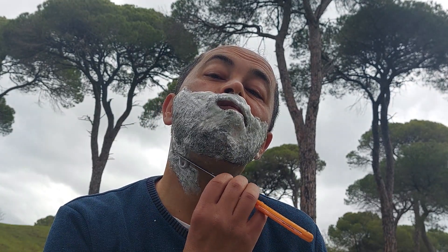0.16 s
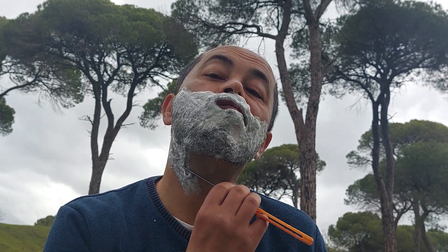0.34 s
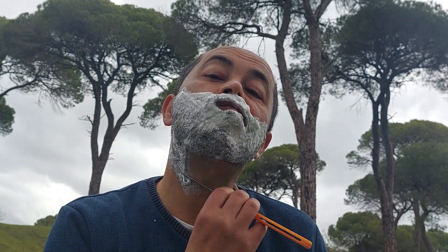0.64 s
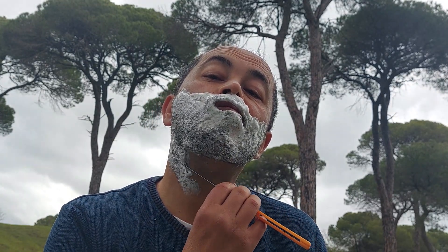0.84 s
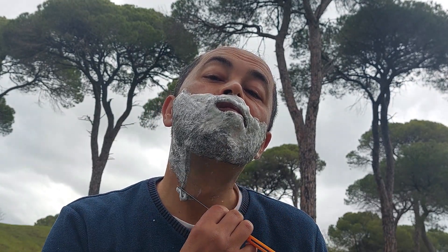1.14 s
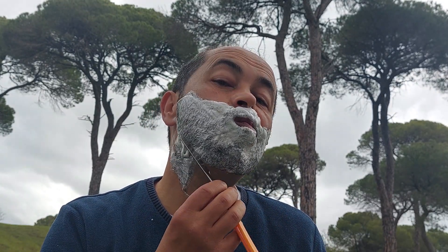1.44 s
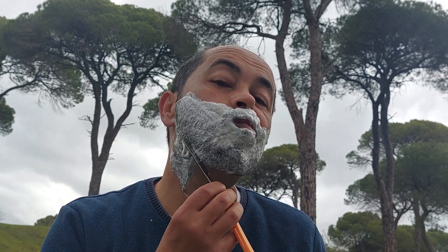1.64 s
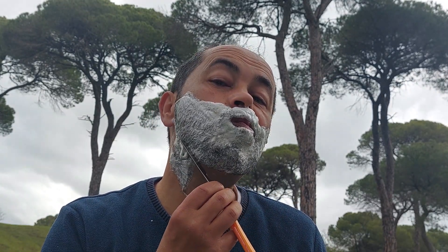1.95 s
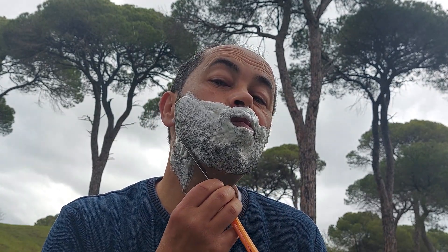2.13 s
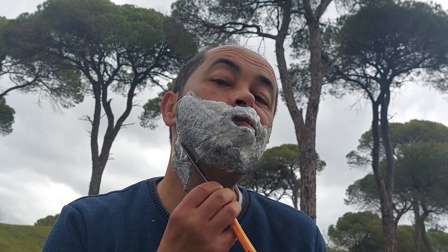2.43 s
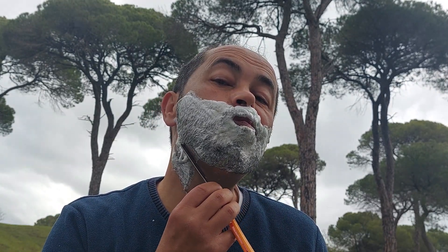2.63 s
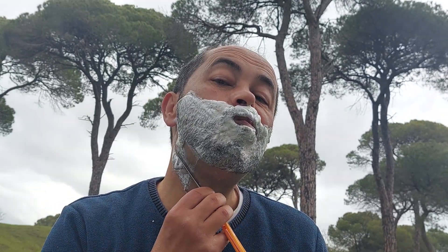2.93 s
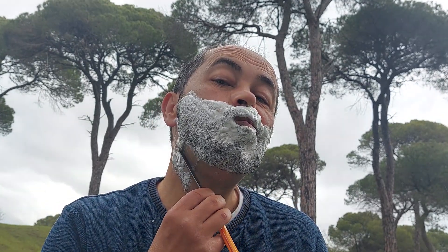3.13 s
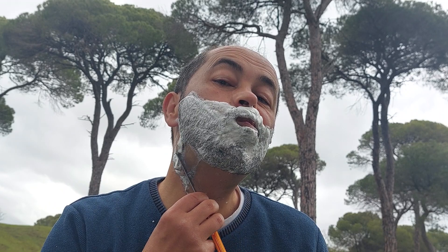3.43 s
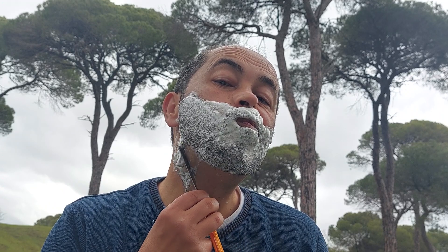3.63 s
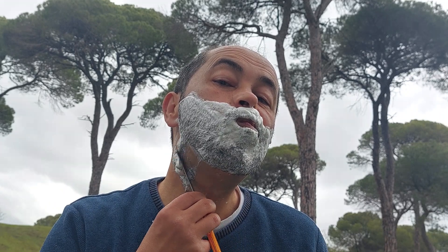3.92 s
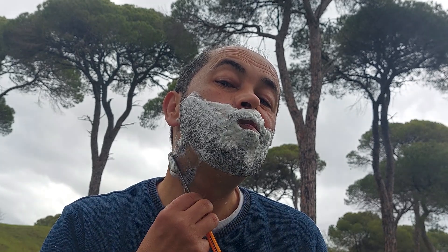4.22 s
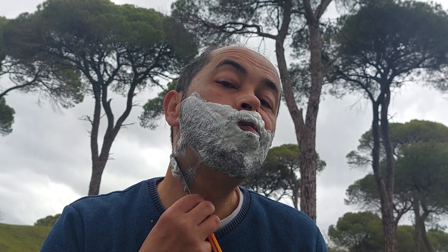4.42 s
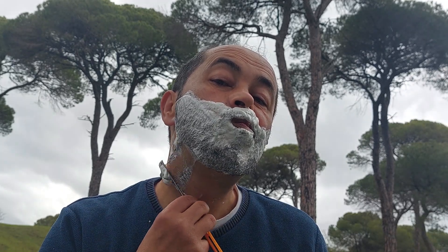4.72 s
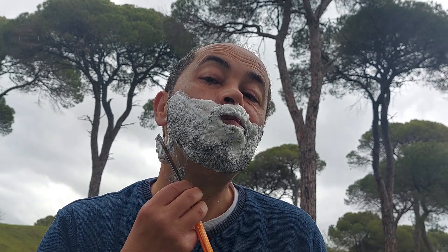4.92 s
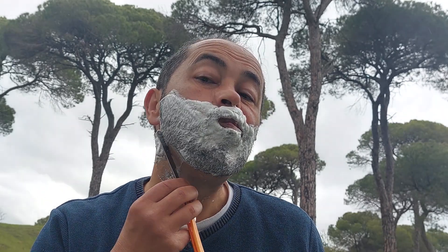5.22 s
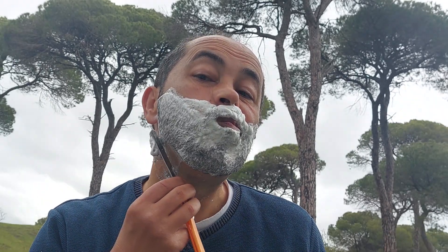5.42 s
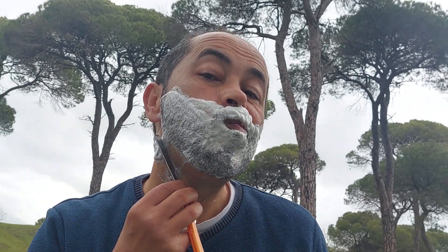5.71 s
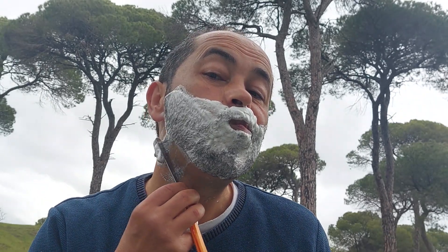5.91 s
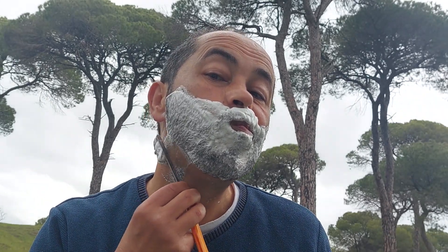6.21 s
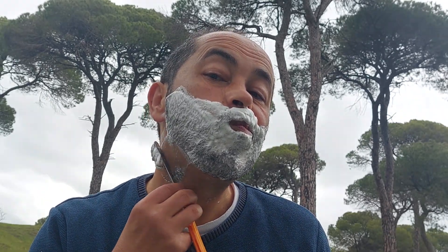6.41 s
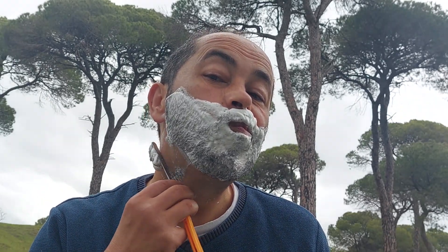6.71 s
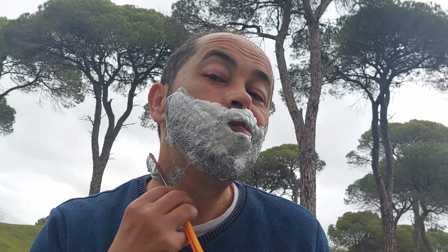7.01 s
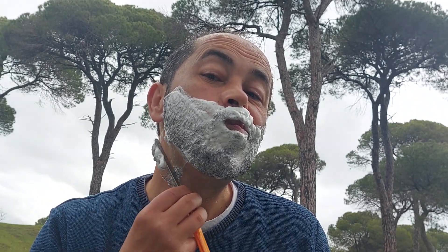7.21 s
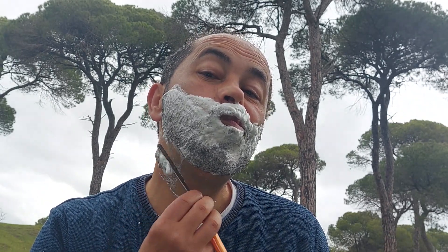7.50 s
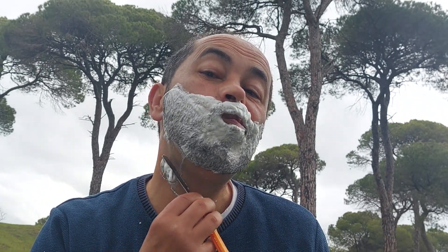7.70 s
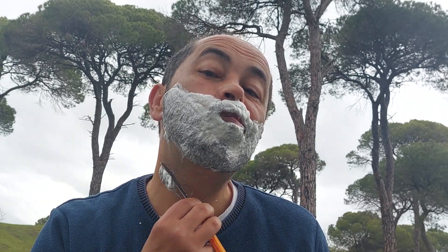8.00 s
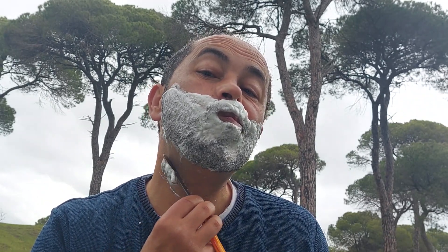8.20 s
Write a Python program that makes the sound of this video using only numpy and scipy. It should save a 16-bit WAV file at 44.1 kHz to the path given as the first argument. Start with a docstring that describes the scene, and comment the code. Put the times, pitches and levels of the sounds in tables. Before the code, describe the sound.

Gritty scraping of a blade on stubble, bright and crackly with little hair snaps, slightly stronger at left. After a few opening strokes there is a gap of over a second, then a steady run, a short break past the middle, and quieter, more spaced scrapes. Deep gusty wind pops strike the left channel around the middle. Open air, sparse reflections, a very faint far drone and engine hum.

```python
"""A straight razor rasps through lathered stubble in short strokes, outdoors, close to a two-port microphone.
Each stroke is a shower of tiny hair snaps coloured by blade and skin; coarse hairs and touches add noise ticks.
Wind is shaped noise, and midway a gust buffets the left port with single pressure swings.
Far away an engine hums in a few sines and speeds up, and a faint drone of noise and gliding tones swells
and passes over steady open-air hiss."""
import sys
import numpy as np
from scipy import signal
from scipy.fft import rfft, irfft, next_fast_len
from scipy.io import wavfile
from scipy.ndimage import map_coordinates

SR = 44100
rng = np.random.default_rng(int(sys.argv[2]) if len(sys.argv) > 2 else 0)


def dump_mix(stems):
    """Bounce the given channels to the path in sys.argv[1] as a 16-bit WAV at rate SR."""
    frames = np.atleast_2d(stems).T  # one column per channel
    limited = np.clip(frames, -1, 1)  # hard clip at full scale
    pcm = np.round(limited * 32767).astype(np.int16)
    wavfile.write(sys.argv[1], SR, pcm)


N = 368235
T = np.arange(N) / SR


def amp(db):
    """Decibels to gain."""
    return 10 ** (np.asarray(db) / 20)


def unit(x):
    """Scaled to rms 1."""
    return x / np.sqrt(np.mean(x ** 2) + 1e-20)


def along(points, hz):
    """Reads (Hz, value) points on a log frequency axis."""
    f, v = np.transpose(points)
    return np.interp(np.log(hz + 1), np.log(f + 1), v)


def curves(rows):
    """One value per sample for each column after the time."""
    s, *cols = np.transpose(rows)
    return [np.interp(T, s, c) for c in cols]


def wobble(rate):
    """A smooth random curve, rate knots a second."""
    knots = rng.standard_normal(int(N * rate / SR) + 4)
    return map_coordinates(knots, [T * rate])


def bell(x, centre, width):
    """A bump that is half as high at the edges of its width."""
    return 0.5 ** ((2 * (x - centre) / width) ** 2)


def filtered(x, response):
    """x times a response of frequency."""
    n = x.shape[-1]
    m = next_fast_len(n + 4096)  # silent padding for the filter's tail
    return irfft(rfft(x, m) * response(np.fft.rfftfreq(m, 1 / SR)), m)[..., :n]


def noise(gain):
    """Unrelated noise of rms 1 at both ports, coloured by a gain of frequency."""
    return unit(filtered(rng.standard_normal((2, N)), gain))


# razor strokes; levels before the razor's own trim, bite below the crest, ring relative to the rasp:
# start_s, swell_s, fade_s, crest_db, bite_below_db, blade_ring_db
STROKES = [(0.055, 0.054, 0.04, -59, 9.5, -36), (0.317, 0.068, 0.061, -63, 12, -6.5),
           (0.6, 0.069, 0.099, -64.5, 17, -4), (0.918, 0.12, 0.11, -69.5, 12.5, -3),
           (2.234, 0.035, 0.04, -55, 14, 0.5), (2.458, 0.036, 0.038, -58, 17, 2.5),
           (2.671, 0.061, 0.037, -62.5, 4.5, 8), (2.891, 0.1, 0.018, -58, 17, 4),
           (3.13, 0.1, 0.046, -59.5, 17.5, 2), (3.407, 0.11, 0.009, -56.5, 20, 1.5),
           (3.68, 0.092, 0.012, -58, 20, 0), (3.929, 0.084, 0.045, -57, 20, 0),
           (4.213, 0.024, 0.069, -58, 5, 0), (4.458, 0.07, 0.019, -55.5, 36, 0),
           (4.695, 0.04, 0.057, -63, 15, -3.5), (5.357, 0.043, 0.026, -63, 11, -13.5),
           (5.591, 0.085, 0.042, -63, 11, -8.5), (5.863, 0.08, 0.031, -60, 37, -10),
           (6.118, 0.074, 0.033, -56.5, 32, -8), (6.383, 0.059, 0.033, -62.5, 25, -4),
           (6.662, 0.07, 0.037, -71, 14, -1), (6.967, 0.069, 0.034, -69, 21, 1),
           (7.332, 0.062, 0.023, -71.5, 14, 2.5), (7.673, 0.076, 0.059, -70, 12, -3),
           (7.938, 0.096, 0.042, -65, 15, -0.5), (8.236, 0.073, 0.2, -67.5, 18, -3.5)]
# what the snaps ring in on every stroke, skin then fizz: centre_hz, width_hz
SCRAPE_BANDS = [(1490, 273), (11500, 9800)]
# colour as the blade works from under the chin up the side of the neck, levels relative to the rasp:
# time_s, skin_db, fizz_db, rasp_hz
PLACE = [(0.05, -41, 3.5, 4870), (0.35, -33, 7, 4850), (2.24, -30, 7.5, 4700), (2.46, -7.5, 7, 4440),
         (3.1, -1, 11, 4860), (3.68, -6, 11.5, 5000), (3.95, -2.5, 4.5, 4870), (4.21, -7, 5, 5100),
         (4.5, -5, 8.5, 4700), (5.35, -8.5, -1, 5470), (5.6, -5, 3.5, 5439), (6.35, -1.5, -5, 4985),
         (7.1, -4.5, 1.5, 4914), (8.25, -3, 4.5, 4950)]
BLADE_HZ, BLADE_HZ_PER_DB = 2340, -12  # the blade rings lower when it is pressed harder
MID_PRESSURE_DB = -64  # a middling pressure
LEFT_DB, RASP_WIDTH_HZ = 5.5, 1450  # the razor is nearer the left port; width of the main rasp


def razor(stray_db=-17, stray_s=0.036, stray_lag_s=0.0066):
    """The blade bites, presses to a crest and lifts; the patch of skin sets the colour of each stroke."""
    hairs = snaps(per_second=4500, smear=0.78, apart=0.38) * slips()
    strays = snaps(per_second=390, smear=0.61, apart=0.74)
    place = np.array(curves(PLACE))
    out = np.zeros((2, N))
    for s, swell, fade, crest_db, bite_db, blade_db in STROKES:
        colour = scrape_colour(place[:, round(s * SR)], crest_db, blade_db)
        leave = s + swell + fade + stray_lag_s
        on = (T > s - stray_s) & (T < leave + 3 * stray_s)
        pressure = stroke_pressure(T[on], s, swell, fade, crest_db, bite_db)
        # single hairs spring back as the edge leaves
        release = amp(crest_db + stray_db) * bell(T[on], leave, 2 * stray_s)
        cut = unit(filtered(hairs[:, on], colour))
        sprung = unit(filtered(strays[:, on], colour))
        out[:, on] += pressure * cut + release * sprung
    port_balance = unit(amp([[LEFT_DB], [0]]))
    return out * port_balance * amp(-1.5)


def scrape_colour(place, crest_db, blade_db, blade_width_hz=520, patchy_db=2.0):
    """Skin, fizz, blade and rasp ring together; reflections from hand and jaw ripple each stroke anew."""
    skin_db, fizz_db, rasp_hz = place
    blade_hz = BLADE_HZ + BLADE_HZ_PER_DB * (crest_db - MID_PRESSURE_DB)
    bands = [*SCRAPE_BANDS, (blade_hz, blade_width_hz), (rasp_hz, RASP_WIDTH_HZ)]
    levels_db = [skin_db, fizz_db, blade_db, 0]
    # each level is a band's whole power, so a wide band stands lower
    modes = [(c, w, amp(db) ** 2 / w) for db, (c, w) in zip(levels_db, bands)]
    ripple_hz = np.arange(0, SR / 2, 450)
    ripple = rng.standard_normal(len(ripple_hz)).clip(-2, 2)

    def colour(hz):
        power = sum(p * bell(hz, c, w) for c, w, p in modes)
        return np.sqrt(power) * amp(patchy_db * np.interp(hz, ripple_hz, ripple))
    return colour


def stroke_pressure(t, s, swell, fade, crest_db, bite_db, land_s=0.011, lift_s=0.0086, lift_db=-12):
    """The edge lands, presses up to the crest, eases off to lift_db below it and lifts."""
    knots = s - land_s + np.cumsum([0, land_s, swell, fade, lift_s])
    return amp(crest_db) * np.interp(t, knots, [0, amp(-bite_db), 1, amp(lift_db), 0])


def snaps(per_second, smear, apart):
    """Hairs part at random moments over the hiss of gliding steel; each port hears them a little differently."""
    cuts = (rng.random(N) < per_second / SR) * rng.standard_normal(N)
    heard = unit(cuts * (1 + apart * rng.standard_normal((2, N))))
    return unit(heard + smear * rng.standard_normal((2, N)))


def slips(per_second=150, uneven=0.51, relax_s=0.0017, steady=0.54):
    """The edge catches on a row of hairs and jerks free at an uneven rate."""
    gaps = np.exp(uneven * rng.standard_normal(4000)) / per_second
    at = (np.cumsum(gaps) * SR).astype(int)
    jerks = np.bincount(at, minlength=N)[:N]
    return unit(steady + signal.lfilter([1], [1, -np.exp(-1 / (relax_s * SR))], jerks))


# coarse hairs that stand out of their stroke with a tick, levels before trim: time_s, peak_db
BRISTLES = [(1.05, -60), (2.288, -44), (3.245, -45.5), (3.485, -46), (3.518, -56), (3.751, -43),
            (3.975, -45), (3.998, -40), (4.248, -46), (5.591, -57.5), (5.919, -49), (6.15, -46),
            (6.722, -59.5), (7.793, -58), (8.021, -58), (8.289, -54)]


def bristles():
    """Coarse hairs part with very short bright ticks."""
    spectrum = [(900, -14), (1600, -2), (3000, -8.0), (5000, 4.0), (15000, 2.0)]  # Hz, relative dB
    return amp(0.5) * ticks(BRISTLES + lesser_bristles(), t60=0.0052, spectrum=spectrum)


def lesser_bristles(count=3, mid_db=-59, grows=0.65, spread_db=1):
    """Every stroke meets a few coarse hairs at random moments, louder under more pressure."""
    rows = []
    for s, swell, fade, crest_db, bite_db, _ in STROKES:
        times = np.minimum(s + rng.random(count) * (swell + fade), T[-1])
        scatter_db = spread_db * rng.standard_normal(count).clip(-2, 2)
        pressure = stroke_pressure(times, s, swell, fade, crest_db, bite_db)
        pressure_db = 20 * np.log10(pressure + 1e-9)
        rows += zip(times, mid_db + grows * (pressure_db - MID_PRESSURE_DB) + scatter_db)
    return rows


# the blade touching down on wet lather, levels before trim: time_s, peak_db
TOUCHES = [(1.653, -59.5), (1.782, -66), (1.967, -65), (2.052, -63), (2.192, -56.5), (2.43, -60),
           (3.403, -62), (4.165, -64), (4.457, -59), (5.31, -64), (5.852, -62)]


def touches():
    """Steel meets wet lather with a soft, longer burst of noise."""
    spectrum = [(900, -30), (2000, -13), (4500, -4.5), (8000, -11.5), (15000, -8.5)]  # Hz, relative dB
    return amp(-9) * ticks(TOUCHES, t60=0.056, spectrum=spectrum)


def ticks(rows, t60, spectrum):
    """Short dying bursts of noise, louder at the left port."""
    bursts, after = np.zeros(N), T[:SR // 20]
    for s, db in rows:
        span = bursts[round(s * SR):][:len(after)]
        span += amp(db - 60 * after / t60)[:len(span)]
    return bursts * noise(lambda hz: amp(along(spectrum, hz))) * amp([[0], [-5]])


# peaks and dips of each microphone port: centre_hz, width_hz, gain_db
LEFT_PORT = [(2020, 430, -5), (3200, 1170, -2.5), (3744, 310, 8.5), (5114, 660, 6.5), (5740, 900, -9.5),
             (6500, 1500, 3), (7300, 460, 2.5), (8790, 860, 7), (9270, 300, -10), (12100, 250, 4),
             (13630, 460, 10.5), (15600, 750, 11)]
RIGHT_PORT = [(1520, 150, 1.5), (2170, 840, 7), (3010, 920, 6.5), (4230, 350, 6), (5540, 180, 5.5),
              (7400, 270, -28), (7850, 330, 9.5), (11900, 820, 3.5), (15200, 1700, -3)]
# phase of the right port ahead of the left: freq_hz, phase_rad
PORT_PHASE = [(1500, -0.2), (2300, -1.93), (3500, -5.5), (4300, 1.8), (5000, 2), (8000, 2), (10000, 0.8),
              (13000, 0.5)]


def ports(x):
    """The two openings colour close treble differently and hear it out of step."""
    def colour(hz, modes):
        return amp(sum(db * bell(hz, c, w) for c, w, db in modes))

    def response(hz):
        left = colour(hz, LEFT_PORT) * np.exp(-1j * along(PORT_PHASE, hz))
        return np.array([left, colour(hz, RIGHT_PORT)])
    return filtered(x, response)


def scatter(x, t60=0.67, wet_db=-17, far_t60=3.9, far_db=-24):
    """A short tail from ground and body, and a thin slow-dying one from the trees, both cut at one second."""
    t = T[:SR]

    def tail(life):
        return unit(rng.standard_normal((2, SR)) * amp(-60 * t / life)) / np.sqrt(SR)
    tails = amp(wet_db) * tail(t60) + amp(far_db) * tail(far_t60)
    return signal.fftconvolve(x.mean(0)[None], tails, axes=1)[:, :N]


# lone eddies, the strongest that hit the left port, levels before trim: time_s, peak_db, half_width_ms
EDDIES = [(1.325, -37.5, 3.2), (2.658, -30, 1.47), (3.083, -31, 2.87), (3.137, -31.5, 3.3),
          (3.261, -32.5, 1.1), (3.287, -31.5, 2.3), (3.578, -25.5, 3.6), (3.695, -27, 2.65),
          (3.816, -22.5, 2.6), (3.846, -13.5, 1.46), (3.871, -31, 0.6), (3.889, -19, 0.84),
          (3.911, -16, 1.2), (3.974, -18, 1.68), (4.056, -14.5, 2.55), (4.233, -23.5, 2.06),
          (4.31, -28.5, 2.3), (4.427, -24.5, 3.6), (4.463, -19.5, 1.45), (4.539, -24.5, 1.52),
          (4.593, -21.5, 3.8), (4.616, -23, 1.7), (4.715, -29.5, 2.1), (5.171, -34.5, 3.9),
          (5.316, -22, 2.14)]


def eddies(flow_db, cut_hz=88, churn=0.6, edge=1.54, top_hz=680, level_db=1.0, leak_db=-32):
    """Each eddy is a smooth pressure swing; small ones reach higher, and the microphone cuts their deepest bass."""
    rows = EDDIES + lesser_eddies(flow_db[0])
    t = T[:SR // 8] - T[SR // 16]
    swirl_spectrum = [(100, 19.5), (300, -11), (700, -32.5), (2000, -100)]  # Hz, relative dB
    swirl = noise(lambda hz: amp(along(swirl_spectrum, hz)))[0]
    out = np.zeros(N)
    for s, db, width_ms in rows:
        turn = rng.uniform(0, 2 * np.pi)  # random phase: push, pull or between
        at = round((s + t[0]) * SR) + np.arange(len(t))
        width = width_ms / 1000
        dip = np.hanning(len(t)) / (1 + (t / width) ** 2) * (1 + churn * swirl[at])

        def band(hz):
            bass_cut = 1 + (cut_hz / (hz + 1)) ** 8
            size_limit = 1 + (hz * width / edge) ** 8
            top_limit = 1 + (hz / top_hz) ** 14
            return np.exp(1j * turn) / np.sqrt(bass_cut * size_limit * top_limit)
        puff = filtered(dip, band)
        out[at] += amp(db + level_db) * puff / np.abs(puff).max()
    return out * amp([[0], [leak_db]])


def lesser_eddies(flow_db, count=48, blowing_s=(2.4, 5.3), over_wind_db=9, top_db=-29.5, spread_db=3.0,
                  half_width_ms=3.24, width_spread=0.2):
    """Eddies shed at uneven intervals while it blows, as strong as the wind that carries them, up to a ceiling."""
    times = np.interp(np.arange(count) + rng.random(count), [0, count], blowing_s)
    size, width = rng.standard_normal((count, 2)).clip(-2, 2).T
    peak_db = np.interp(times, T, flow_db) + over_wind_db + spread_db * size
    widths_ms = half_width_ms * np.exp(width_spread * width)
    return list(zip(times, np.minimum(peak_db, top_db), widths_ms))


# steady air over the ports, levels before trim: time_s, left_db, right_db
WIND = [(0.2, -66.5, -56), (1.15, -75, -61.5), (1.7, -65.5, -55.5), (2.05, -71, -60), (2.5, -48.5, -58),
        (2.9, -68, -62.5), (3.2, -54, -61), (4.1, -52, -60), (4.8, -58.5, -57), (5.7, -52, -56),
        (6, -64.5, -60), (6.55, -69, -60), (8.35, -69, -59.5)]
# gusts on top of it, timed at their height, levels before trim: time_s, length_s, left_db, right_db
GUSTS = [(1.343, 0.13, -50.5, -59), (2.528, 0.12, -52, -60), (3.07, 0.16, -45, -68),
         (3.261, 0.16, -42.5, -52.5), (3.648, 0.28, -45, -59), (3.877, 0.11, -31.5, -70),
         (4.256, 0.075, -31.5, -67), (4.565, 0.17, -36, -48), (5.286, 0.09, -45, -69),
         (6.326, 0.059, -47.5, -65), (6.716, 0.13, -51.5, -50)]


def airflow(skew=0.26):
    """Wind level in dB at each port: steady air plus gusts that rise faster than they die."""
    power = amp(curves(WIND)) ** 2
    for s, length, *port_db in GUSTS:
        swell = bell(T, s, length * (1 + skew * np.sign(T - s)))
        power = power + (amp(port_db)[:, None] * swell) ** 2
    return 10 * np.log10(power)


# spectrum of slow air, shape only: freq_hz, density_db
BREEZE = [(20, -24.5), (32, -22.5), (45, 2.5), (65, 0), (92, -8), (135, -10), (175, -22), (235, -23.5),
          (430, -40), (700, -54.5), (1500, -120)]
# spectrum of broken, buffeting air, shape only: freq_hz, density_db
GUST = [(22, -19.5), (36, -4.5), (55, 2), (115, 2.5), (195, -16), (290, -17), (450, -45), (650, -56),
        (1000, -88), (1700, -120)]


def wind(flow_db, gust_db=-44, spread_db=4, lumpy_db=-2.0, restless_db=2.0):
    """Slow air rumbles; faster air breaks into brighter, lumpier buffeting."""
    level_db = flow_db + restless_db * np.array([wobble(9), wobble(10)])
    broken = 1 / (1.0 + np.exp((gust_db - level_db) / spread_db))  # share of broken air, 0 to 1
    breeze = noise(lambda hz: amp(along(BREEZE, hz)))
    lumps = amp(lumpy_db * np.array([wobble(30), wobble(26)]))
    gust = unit(noise(lambda hz: amp(along(GUST, hz))) * lumps)
    rumble = amp(4.5) * np.sqrt(1 - broken) * breeze
    buffet = amp(2.5) * np.sqrt(broken) * gust
    return amp(level_db) * (rumble + buffet)


# distant engine, pitch before its waver and level before order and port gains: time_s, firing_hz, level_db
ENGINE = [(0, 59, -66.5), (3, 58.43, -63.5), (4, 60.78, -59), (4.6, 61.66, -60), (5.1, 62.8, -54),
          (5.5, 65.74, -62.5), (6.2, 66.76, -65), (6.8, 68.3, -60), (7.4, 69.82, -65), (8.35, 68.97, -67)]
# the orders that carry: multiple of the firing rate, relative_db
ENGINE_ORDERS = [(0.602, -8.5), (1.002, 4), (2, -5.5)]


def engine(unsteady=0.02805, flutter_db=3):
    """Only the lowest orders carry this far, wavering on the wind."""
    hz, db = curves(ENGINE)
    phase = 2 * np.pi * np.cumsum(hz * (1 + unsteady * wobble(12))) / SR
    hum = sum(amp(level + flutter_db * wobble(8)) * np.sin(k * phase) for k, level in ENGINE_ORDERS)
    return amp(db) * hum * amp([[-2], [2.5]])


# haze of the far drone, swelling and passing: time_s, level_db
DRONE = [(2.45, -100), (2.68, -75.5), (2.85, -79), (3.1, -76), (3.25, -76.5), (3.6, -100)]
# tones that surface in the haze, timed at their height: time_s, length_s, pitch_hz, glide_hz_per_s, level_db
DRONE_TONES = [(2.598, 0.09, 774, 50, -81), (2.689, 0.15, 545, 61.5, -76.5), (3.039, 0.22, 577, 40, -73.5),
               (3.12, 0.11, 810, 597, -73.5)]


def drone(waver=0.016):
    """A band of hazy noise in which wavering, gliding tones come and go."""
    out = amp(curves(DRONE)) * noise(lambda hz: bell(hz, 770, 620))
    unsteady = 1 + waver * np.array([wobble(45), wobble(45)])
    for s, length, hz, glide, db in DRONE_TONES:
        on = np.abs(T - s) < 2 * length
        pitch_hz = (hz + glide * (T[on] - s)) * unsteady[:, on]
        phase = 2 * np.pi * np.cumsum(pitch_hz, axis=1) / SR
        out[:, on] += amp(db) * bell(T[on], s, length) * np.sqrt(2) * np.sin(phase)
    return out


# spectrum of the open air, shape only: freq_hz, density_db
AIR = [(150, -31.5), (250, -8), (480, -17.5), (650, -24), (1600, -27.5), (2200, -29.5), (3600, -34.5),
       (6000, -36), (10000, -39.5), (13000, -34), (15800, -36)]


def open_air(level_db=-74.0, left_db=-1.63):
    """Even hiss of the open air, a little softer at the left port."""
    return amp(level_db) * noise(lambda hz: amp(along(AIR, hz))) * amp([[left_db], [0]])


def scene():
    """The close razor over wind and far sounds."""
    shave = ports(razor() + bristles() + touches())
    flow_db = airflow()
    near = shave + scatter(shave) + eddies(flow_db) + wind(flow_db)
    return near + engine() + drone() + open_air()


def record(dry, top_hz=15830):
    """The recorder keeps nothing above its band limit."""
    return filtered(dry, lambda hz: hz < top_hz)


dry = scene()
out = record(dry)
dump_mix(out)
```